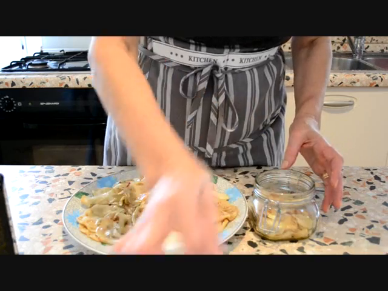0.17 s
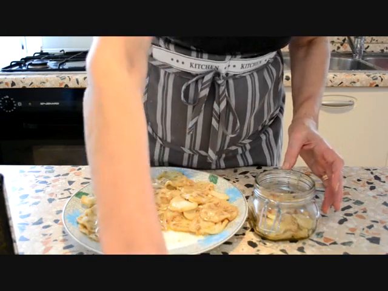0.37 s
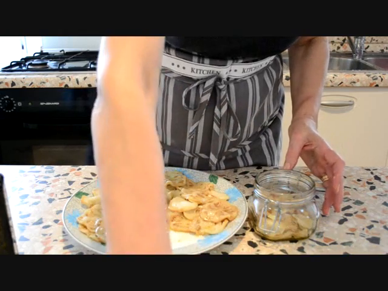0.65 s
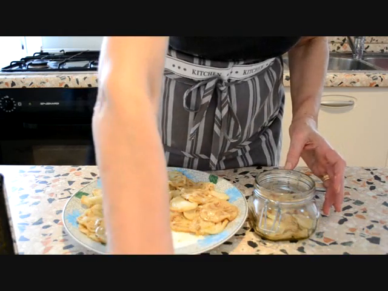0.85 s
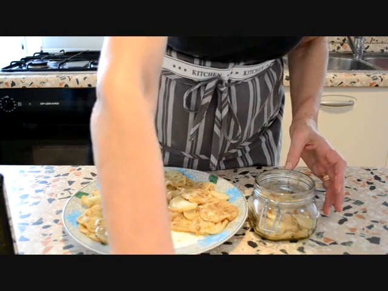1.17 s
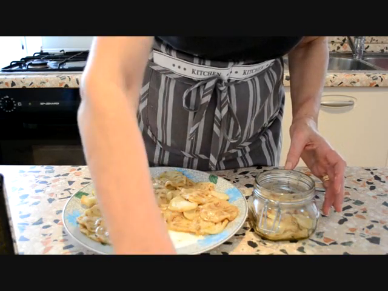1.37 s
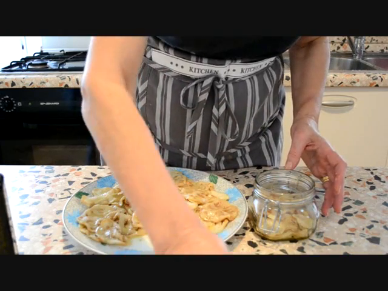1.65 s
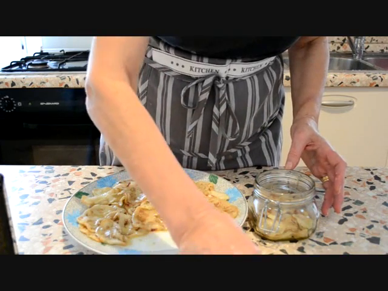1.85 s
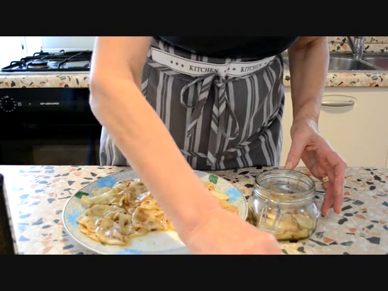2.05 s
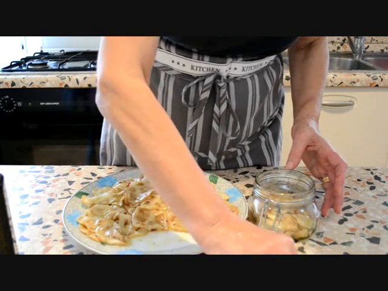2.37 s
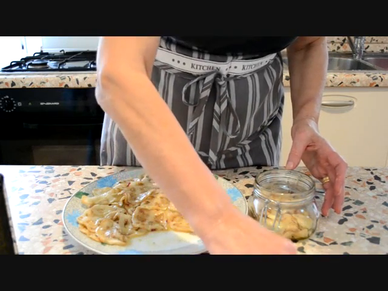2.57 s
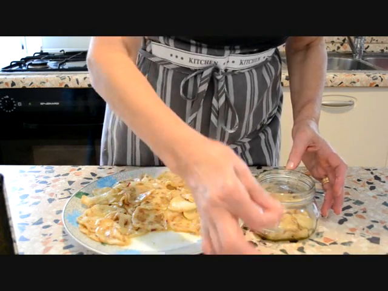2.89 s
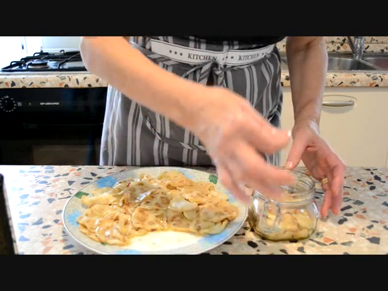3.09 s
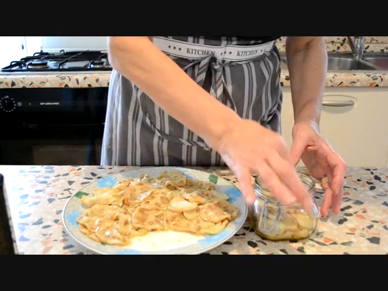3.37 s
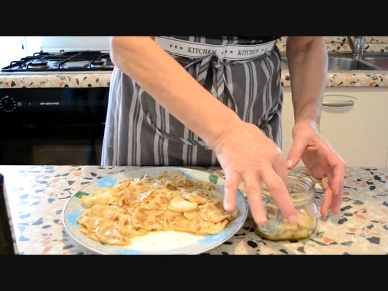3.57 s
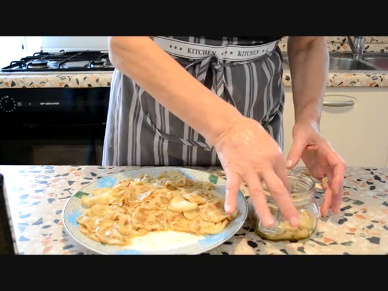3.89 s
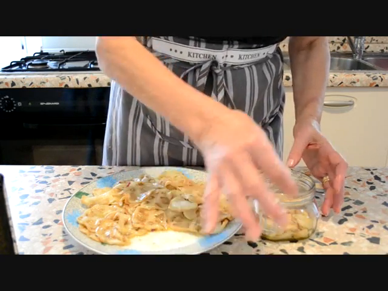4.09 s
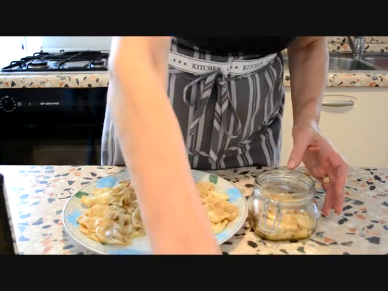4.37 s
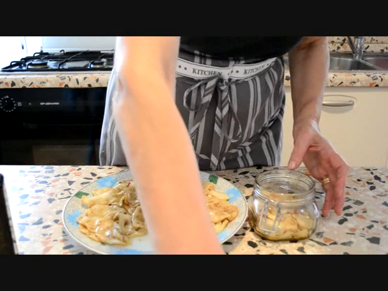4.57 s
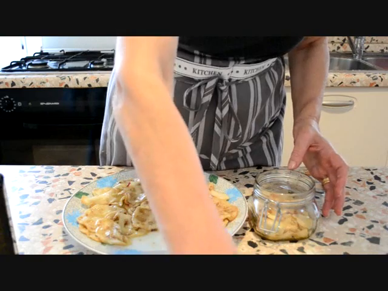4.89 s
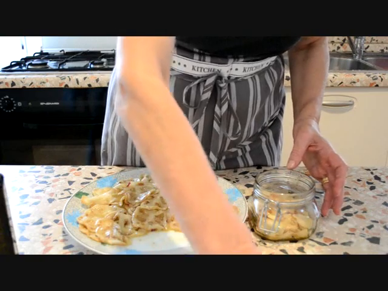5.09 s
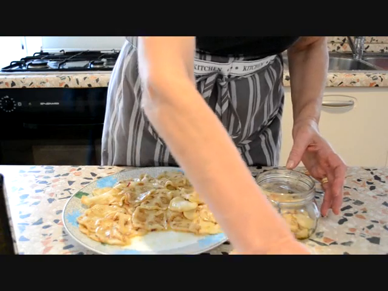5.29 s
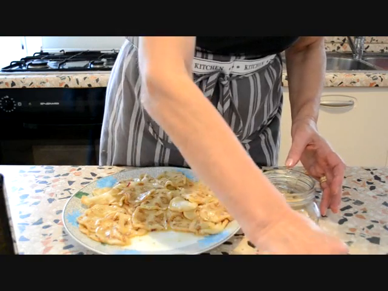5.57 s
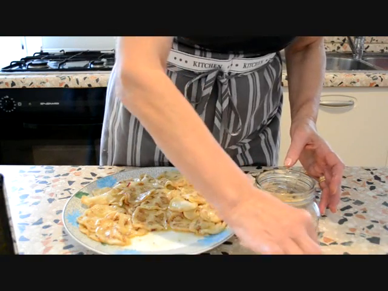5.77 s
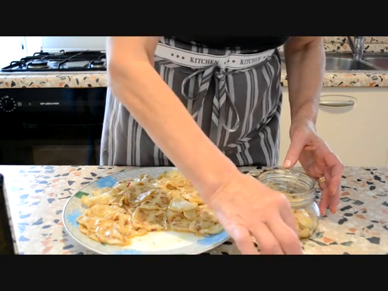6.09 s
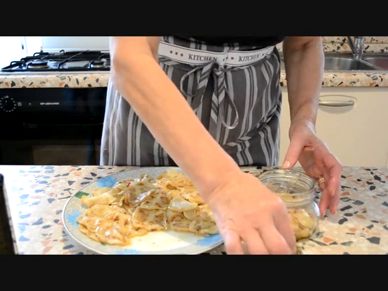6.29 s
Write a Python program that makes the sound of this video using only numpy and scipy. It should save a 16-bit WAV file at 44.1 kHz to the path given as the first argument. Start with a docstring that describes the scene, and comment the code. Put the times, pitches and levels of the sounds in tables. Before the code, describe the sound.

A few soft knocks lead into glass sliding over a stone countertop, with sharp clinks against another dish and a loud, bright final strike. Wet food slices tick faintly and a hand bumps the jar. A second, darker scrape lasts a little over a second. The clinks and handling are near the microphone, while the scraping rings out in a tiled kitchen over a low appliance hum.

```python
"""A glass dish is nudged and dragged over a stone kitchen counter, clinks hard against other glass
and is dragged again. Its foot knocks, sticks and slips, ringing the counter and the glass.
Between the drags a hand bumps a jar and wet food slices tick faintly.
The tiled room rings on for about a second over the hum and air of a kitchen appliance."""
import sys
import numpy as np
from scipy import signal
from scipy.fft import rfft, irfft
from scipy.io import wavfile

SR = 44100
rng = np.random.default_rng(int(sys.argv[2]) if len(sys.argv) > 2 else 0)


def pcm_store(signal):
    """Save signal as 16-bit PCM."""
    levels = np.round(np.clip(np.atleast_2d(signal), -1, 1) * 32767)
    wavfile.write(sys.argv[1], SR, levels.astype(np.int16).T)


N = 284004
T = np.arange(N) / SR

# resonances of the counter under the dish: pitch_hz, width_hz, level_db
COUNTER_MODES = [(391.8, 10, 3.5), (435, 35, -4.5), (650, 160, 0.5), (848, 44.3, 0.5), (1026, 36.7, -12),
                 (1505, 90, -10), (1926, 98, -8.5), (2220, 37, -17.5)]
# wall modes, one list for the dish and one for its neighbour: pitch_hz, level_db, t60_s
GLASS_MODES = [
    [(5940, 1.5, 0.082), (7560, -3.5, 0.058), (7750, -13, .15)],
    [(5565, 0, .38), (5605, -10, .3), (5843, -7, .27), (7238, 4, .2), (5250, 3.5, .012),
     (7220, -5, 0.02676)],
]


def dish_drags(grit_db_per_force_db=.6, grit_db_per_s=1.5):
    """The dish slides three times: more force is louder and grittier, and grit gathers on the way."""
    # slides: start_s, full_force_s, stop_s, level_db, easing_db_per_s, lurch_db, grit_db, colour_name
    slides = [(1.378, 1.63, 1.96, -28.5, 33.5, 1, 1.5, "first"),
              (2.21, 2.233, 2.283, -39, 32.5, 2, -13, "first"),
              (4.9, 5.137, 6.111, -30, 0.5, 1.35, 5, "second")]
    # friction colour of the two early slides: frequency_hz, level_db
    early_colour = [(100, -37), (230, -22), (310, -16), (390, -2.5), (500, -7), (650, 0), (1000, -0.5),
                    (1550, -1), (2200, -10.5), (3200, -18.5), (4800, -24), (7000, -26.5), (9500, -31.5),
                    (11300, -46)]
    # darker friction colour of the last slide: frequency_hz, level_db
    late_colour = [(100, -42), (260, -28.5), (330, -23), (390, -14), (520, -12), (760, -3), (920, 2.5),
                   (1150, -1.5), (1850, -8), (2500, -16.5), (3600, -27.5), (5500, -33.5), (9500, -42),
                   (11300, -55)]
    friction = {"first": (early_colour, -27), "second": (late_colour, -36)}  # colour, glass_db
    out = 0
    for start, full, stop, db, easing, lurch_db, grit_db, colour_name in slides:
        force_db = hand_push(start, full, stop, easing, lurch_db)
        gathered_db = grit_db_per_s * (np.clip(T, start, stop) - full)
        edge_db = grit_db + grit_db_per_force_db * force_db + gathered_db
        force = undb(db + force_db) * (T > start)
        out = out + force * stick_slip(edge_db, *friction[colour_name])
    return out


def hand_push(start, full, stop, easing, lurch_db, breakaway_db=-8.5, lurch_s=.36, release_t60_s=.09):
    """Force in dB re full: the dish breaks away, the push builds, surges, eases and is let go."""
    build = breakaway_db * np.clip((full - T) / (full - start), 0, 1)
    held_s = np.clip(T - full, 0, None)
    surge = lurch_db * np.cos(2 * np.pi * held_s / lurch_s)
    release = 60 * np.clip(T - stop, 0, None) / release_t60_s
    return build + surge - easing * held_s - release


def stick_slip(grit_db, colour, glass_db, slips_per_s=1800, scatter_db=3, chatter_hz=70, grit_hz=3000):
    """The foot sticks and slips on the stone; the slips come in bunches and ring counter and glass."""
    # modes in which the sliding dish sings: pitch_hz, level_db, t60_s
    rubbed_glass = [(5890, 0, 0.046), (7600, -15, .05)]
    slipping = rng.random(N) < slips_per_s / SR
    strength = undb(scatter_db * np.minimum(rng.exponential(size=N), 4))
    polarity = rng.choice([-1, 1], N)
    chatter = undb(wander(chatter_hz))
    slips = unit(slipping * strength * polarity * chatter)
    stone = unit(resonate(through(slips, response(colour)), COUNTER_MODES))
    scrape = stone + undb(glass_db) * through(slips, ring(rubbed_glass))
    # grit under the foot sharpens each slip
    dull = signal.sosfiltfilt(signal.butter(2, grit_hz, fs=SR, output="sos"), scrape)
    return dull + undb(grit_db) * (scrape - dull)


def dish_knocks(gain_db=15, wall_db=-19, rattle_s=.04):
    """The dish rocks on its foot, ringing its body and wall; a softer contact leaves out the treble."""
    # knocks of the foot on the stone: start_s, level_db, cutoff_hz, body_send_db
    knocks = [(0.8248, -15.5, 2300, -14.5), (1.0, -20, 1020, -13.5), (1.045, -28, 850, -15),
              (1.936, -2.5, 2900, -29.5), (1.961, -2.5, 2612, -25.5), (2.029, -10, 1590, -18),
              (2.70, -37.5, 1490, -22), (4.754, -25.5, 1170, -16)]
    # colour of the contact: frequency_hz, level_db
    knock_colour = [(60, -49), (130, -22.5), (230, -23), (400, -10.5), (700, -3.5), (1200, 5.5), (1550, 3),
                    (2300, 0.5), (3000, -11), (11000, -15)]
    # low modes of the loaded dish: pitch_hz, level_db, t60_s
    body_modes = [(696.5, -4.5, 0.12), (841, 4, 0.2), (1170, -12, 0.076)]
    contacts, body, wall = np.zeros((3, N))
    for start, db, cutoff_hz, body_send_db in knocks:
        rattle = signal.sosfilt(signal.butter(4, cutoff_hz, fs=SR, output="sos"), burst(rattle_s))
        add(contacts, start, undb(db) * rattle)
        add(body, start, 2 * undb(db + body_send_db) * ring(body_modes))
        add(wall, start, undb(db + wall_db) * ring(GLASS_MODES[0]))
    stone = resonate(through(contacts, response(knock_colour)), COUNTER_MODES)
    return undb(gain_db) * (stone + body) + wall


def glass_clinks(ring_gain_db=10, crack_gain_db=12, skid_db=-4):
    """Glass meets glass: a hard crack, a brief skid and a high ring; returns rings and cracks."""
    # hits: start_s, ring_db, crack_db, skid_s, glass_index (0 the dish, 1 its neighbour)
    clinks = [(1.3295, -49, -44, .02, 0), (1.5649, -7.5, -20, .04, 0), (1.583, -12, -22, .14, 0),
              (1.644, -25, -16, .014, 0), (1.9363, 7, -6, .018, 1)]
    # colour of the crack: frequency_hz, level_db
    crack_colour = [(100, -27), (400, -19.5), (1000, 1), (2700, 11.5), (4300, -2), (5700, 4.5),
                    (7500, -2.5), (8500, -10), (11000, -18.5)]
    rings, cracks = np.zeros((2, N))
    for start, ring_db, crack_db, skid_s, glass_index in clinks:
        add(rings, start, undb(ring_db) * ring(GLASS_MODES[glass_index]))
        contact = undb(skid_db) * burst(skid_s)
        contact[0] += 1  # the first touch is a single sharp pulse
        add(cracks, start, undb(crack_db) * contact)
    return undb(ring_gain_db) * rings, undb(crack_gain_db) * through(cracks, response(crack_colour))


def jar_bump(start_s=3.9926, level_db=-13, gap_s=.013, loss_db=2.2, low_cut_hz=250):
    """A hand bumps the filled jar, which rocks to rest in four dull contacts, each weaker."""
    # modes of the jar on the counter: pitch_hz, level_db, t60_s
    jar_modes = [(266, -10, 0.1), (395, 5, 0.023), (546, -0.5, 0.057), (620, 2.5, 0.016),
                 (830, -1.5, 0.015), (1260, -4.5, 0.021), (1955, -6, 0.025), (2230, -4.5, 0.022),
                 (3420, -17, 0.021)]
    rocking = np.zeros(N)
    for k in range(4):
        add(rocking, start_s + k * gap_s, undb(level_db - k * loss_db) * ring(jar_modes))
    # so small a body radiates no bass
    return signal.sosfilt(signal.butter(2, low_cut_hz, "high", fs=SR, output="sos"), rocking)


def wet_ticks(gain_db=11, tick_s=.0094, relative_width=.12, settle_db=-49):
    """Wet slices and fingertips tick in tiny pitched bursts; six fainter ones fall as slices settle."""
    # the clearest ticks: start_s, level_db, pitch_hz
    clear_ticks = [(2.71, -35, 8000), (3.089, -41, 7600), (3.6243, -37, 9800), (3.992, -29.5, 5800),
                   (4.6975, -23, 2650), (4.698, -31, 5240)]
    settling = [(rng.uniform(2.4, 4.8), settle_db, rng.uniform(6000, 9800)) for _ in range(6)]
    ticks = np.zeros(N)
    for start, db, hz in clear_ticks + settling:
        add(ticks, start, undb(db) * band(burst(tick_s), hz, relative_width * hz))
    return undb(gain_db) * ticks


def kitchen_tail(build_s=.0043):
    """Dense echoes of hard walls: the tail builds in milliseconds and its treble dies first."""
    # decay of the tiled room: frequency_hz, t60_s
    room_decay = [(100, 0.97), (350, 0.82), (700, 0.9), (1400, 0.7), (2700, 0.6), (5500, 0.64),
                  (11000, 0.27)]
    t = T[:SR * 3 // 2]
    hz = np.fft.rfftfreq(len(t), 1 / SR)
    spectrum = rfft(rng.standard_normal(len(t)))
    onset = 1 - np.exp(-t / build_s)
    edges_hz = np.geomspace(40, 16000, num=27)
    tail = 0
    for low, high in zip(edges_hz[:-1], edges_hz[1:]):
        part = irfft(spectrum * (hz >= low) * (hz < high), len(t))
        part *= onset * undb(-60 * t / along(low, room_decay))
        tail = tail + part * np.sqrt(2 * (high - low) / SR) / np.linalg.norm(part)  # equal energy per Hz
    return tail


def moving_echoes(x, step_s=.17, count=4):
    """Echoes shift as around a sliding dish: the sound crossfades through a cycle of room tails."""
    out = 0
    for k in range(count):
        steps_away = np.abs((T / step_s - k + count / 2) % count - count / 2)
        fade = np.cos(np.pi / 2 * np.minimum(steps_away, 1))
        out = out + through(x * fade, kitchen_tail())
    return out


def appliance(air_db=-60.5):
    """A nearly steady motor hum over air rushing through a housing."""
    # motor tones: pitch_hz, level_db
    motor_tones = [(96.9, -76), (193.8, -81.5), (441.4, -73), (489.9, -63), (538.3, -82.5), (931.3, -82.5)]
    # colour of the rushing air: frequency_hz, level_db
    air_colour = [(25, -33.5), (60, -19), (120, -16), (190, -15), (280, -13.5), (600, -11), (1000, -12.5),
                  (2000, -15), (3300, -19), (4300, -22), (5300, -21), (7000, -30), (9500, -30),
                  (11000, -43)]
    # resonances of the housing: pitch_hz, width_hz, level_db
    housing_modes = [(470, 89.5, -6), (2660, 180, 4), (2947, 340, 1.5)]
    hum = 0
    for hz, db in motor_tones:
        amplitude = np.sqrt(2) * undb(db + .7 * wander(5))
        hum = hum + amplitude * np.sin(2 * np.pi * hz * T + .1 * wander(4))
    rush = through(rng.standard_normal(N), response(air_colour))
    air = unit(resonate(rush, housing_modes))
    return hum + undb(air_db + .3 * wander(3)) * air


def undb(db):
    """Decibels to gain."""
    return 10 ** (np.asarray(db) / 20)


def unit(x):
    """Scale to rms 1."""
    return x / np.sqrt(np.mean(x ** 2))


def along(hz, points):
    """Read a curve of (frequency_hz, value) points on a log-frequency axis."""
    points_hz, values = np.transpose(points)
    return np.interp(np.log(hz + 1e-3), np.log(points_hz), values)


def response(colour, size=4096):
    """Minimum-phase impulse response of a colour, with energy 1."""
    gain = undb(along(np.fft.rfftfreq(size, 1 / SR), colour))
    cepstrum = irfft(np.log(gain))
    cepstrum[1:size // 2] *= 2
    cepstrum[size // 2 + 1:] = 0
    impulse = irfft(np.exp(rfft(cepstrum)))
    return impulse / np.linalg.norm(impulse)


def through(x, impulse):
    """Pass a sound through an impulse response."""
    return signal.fftconvolve(x, impulse)[:N]


def band(x, hz, width_hz):
    """One resonance, gain 1 at its centre."""
    return signal.lfilter(*signal.iirpeak(hz, hz / width_hz, fs=SR), x)


def resonate(x, modes):
    """Lift a sound at a body's resonances."""
    return x + sum(undb(db) * band(x, hz, width_hz) for hz, width_hz, db in modes)


def ring(modes):
    """Free ringing of a struck body, with energy 1; successive modes start in opposite directions."""
    t = T[:SR]
    ringing = sum((-1) ** k * undb(db - 60 * t / t60) * np.sin(2 * np.pi * hz * t)
                  for k, (hz, db, t60) in enumerate(modes))
    return ringing / np.linalg.norm(ringing)


def burst(t60_s):
    """A dying flurry of tiny contacts, with energy 1."""
    t = T[:SR // 4]
    flurry = rng.standard_normal(len(t)) * undb(-60 * t / t60_s)
    return flurry / np.linalg.norm(flurry)


def wander(rate_hz):
    """Smooth random drift with a spread near 1."""
    return 1.2 * np.interp(T * rate_hz, np.arange(4096), rng.standard_normal(4096))


def add(out, start_s, x):
    """Mix x into out from start_s."""
    i = int(start_s * SR)
    out[i:i + len(x)] += x[:N - i]


def scene():
    """The counter radiates mostly into the room; clinks, jar and food are more up front."""
    counter = dish_drags() + dish_knocks()
    rings, cracks = glass_clinks()
    handling = undb(-3) * (jar_bump() + wet_ticks())
    direct = undb(-10) * counter + undb(-1) * rings + undb(-5) * cracks + handling
    room_send = counter + undb(-4) * rings + cracks + handling
    return (direct + moving_echoes(room_send) + appliance())[None]


def record(dry, ceiling=.823, notch_hz=7950, notch_width_hz=450, low_cut_hz=60, top_hz=11100):
    """The microphone's port notches the treble; peaks are rounded, the bass thinned and the top cut."""
    notched = dry - .5 * band(dry, notch_hz, notch_width_hz)
    rounded = ceiling * np.tanh(notched / ceiling)
    thinned = signal.sosfilt(signal.butter(1, low_cut_hz, "high", fs=SR, output="sos"), rounded)
    return signal.sosfilt(signal.ellip(10, .2, 70, top_hz, fs=SR, output="sos"), thinned)


dry = scene()
out = record(dry)
pcm_store(out)
```